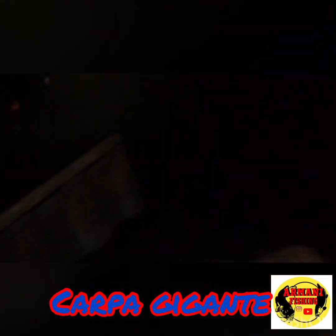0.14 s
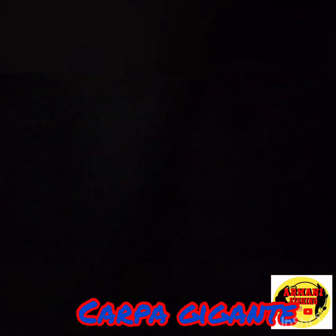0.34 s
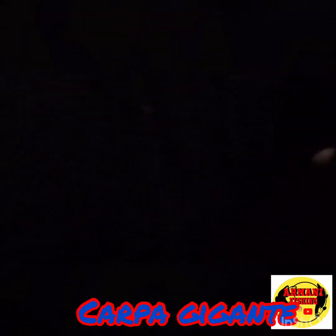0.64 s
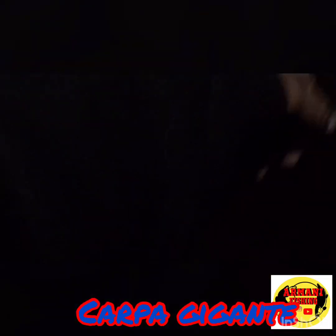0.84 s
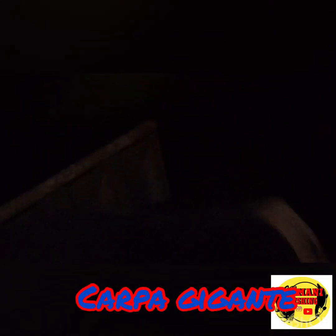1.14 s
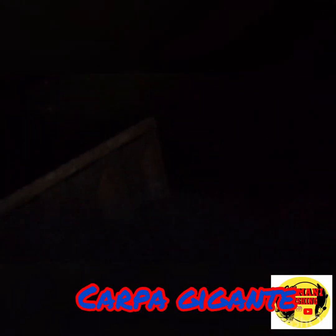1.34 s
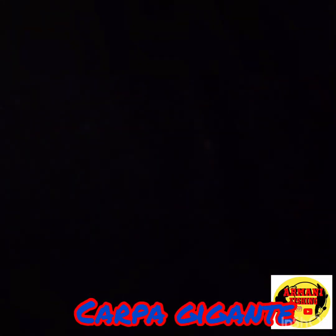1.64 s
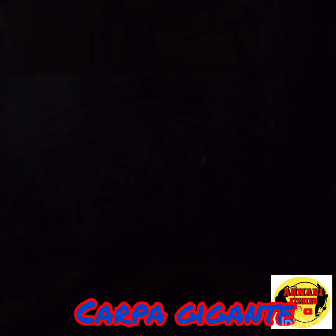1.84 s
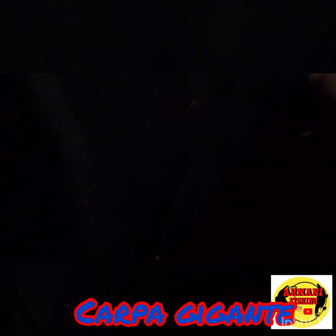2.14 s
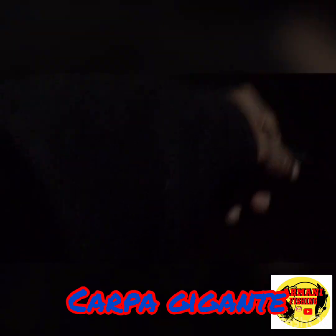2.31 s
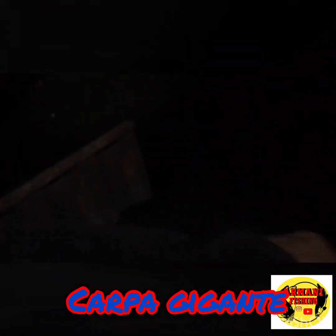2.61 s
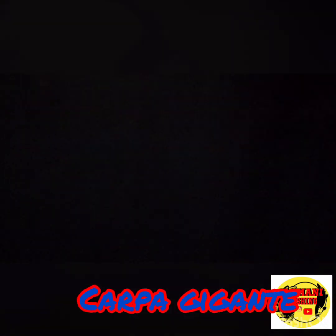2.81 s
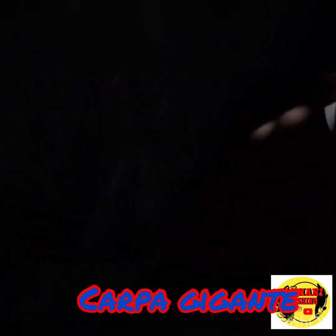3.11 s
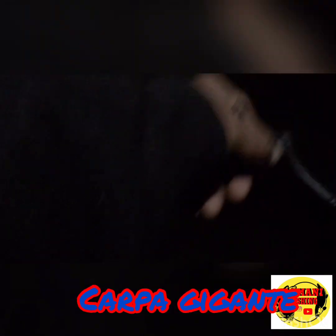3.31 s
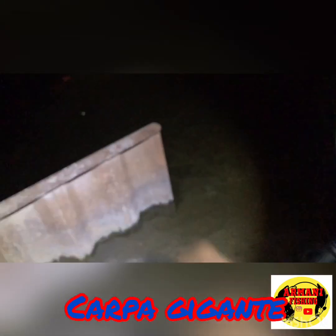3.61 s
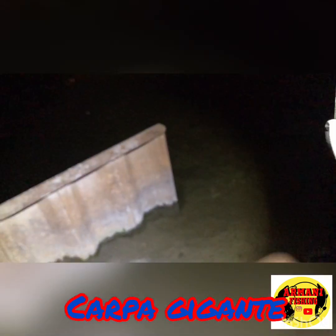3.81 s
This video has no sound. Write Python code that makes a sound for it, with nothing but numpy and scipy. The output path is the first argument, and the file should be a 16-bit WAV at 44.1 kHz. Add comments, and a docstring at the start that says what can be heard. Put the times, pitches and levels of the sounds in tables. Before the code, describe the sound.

A fishing reel's ratchet clicks close to the microphone from the start, sharp, dry and bright, about 30 to 40 snaps a second. Faint spool ringing and gritty gear whirr run beneath. Loose metal fittings clink irregularly, strongest near 0.95 s. Clicking slows around 1.3-1.9 s, then quickens unevenly, densest near 2.5 and 3.3-3.6 s, continuing to the end. Low outdoor rumble swells softly around 0.8 s.

```python
"""A fishing reel turns unevenly, close by, over a low outdoor rumble (shaped noise).
From the start the spool rings faintly and the gears whirr and scrape: sines stepped by the teeth,
gritty noise, and sparse impulses ringing the reel body. Within 0.04 s a sprung pawl begins to snap over
the ratchet teeth (short bursts plus ringing modes). From 0.15 s two loose metal fittings clink now and
then (decaying modes)."""
import sys
import numpy as np
from scipy import signal
from scipy.fft import rfft, irfft
from scipy.io import wavfile
from scipy.ndimage import uniform_filter1d

SR = 44100
rng = np.random.default_rng(int(sys.argv[2]) if len(sys.argv) > 2 else 0)


def materialize(psi):
    """Save the field psi as 16-bit PCM at rate SR to the path in sys.argv[1].

    A 1-D psi becomes a single channel; in a 2-D psi each row is a channel.
    """
    bounded = np.clip(np.atleast_2d(psi).T, -1, 1)
    quanta = np.round(bounded * 32767).astype(np.int16)
    wavfile.write(sys.argv[1], SR, quanta)


def rack_gain(trim_db):
    """Turn a fader trim in dB into the linear factor to multiply a signal by."""
    fader = np.asarray(trim_db, float)
    return 10 ** (fader / 20)


N = 174195

# Pawl dropping off each tooth: start_s
TEETH_S = [0.0328, 0.07, 0.1027, 0.14, 0.1772, 0.201, 0.2353, 0.264, 0.2903, 0.3233, 0.3546, 0.389, 0.4218,
           0.4487, 0.4657, 0.4843, 0.5068, 0.531, 0.5531, 0.5746, 0.5938, 0.616, 0.636, 0.688, 0.7161,
           0.738, 0.756, 0.7766, 0.7953, 0.8177, 0.844, 0.8627, 0.889, 0.912, 0.929, 0.9693, 0.987, 1.0047,
           1.0268, 1.047, 1.069, 1.0926, 1.1126, 1.136, 1.1754, 1.1962, 1.2213, 1.2488, 1.276, 1.301, 1.33,
           1.411, 1.4408, 1.468, 1.501, 1.5336, 1.5583, 1.5871, 1.6237, 1.6599, 1.707, 1.764, 1.8246,
           1.8716, 1.8956, 1.9427, 1.9594, 1.977, 1.996, 2.013, 2.0348, 2.0644, 2.1059, 2.1429, 2.1741,
           2.2023, 2.229, 2.2536, 2.282, 2.3087, 2.3461, 2.3863, 2.4144, 2.44, 2.4585, 2.473, 2.4875, 2.503,
           2.514, 2.5332, 2.556, 2.5862, 2.613, 2.6342, 2.6597, 2.6924, 2.7258, 2.753, 2.782, 2.806, 2.8262,
           2.8624, 2.8803, 2.902, 2.9252, 2.949, 2.9797, 3.0135, 3.035, 3.051, 3.063, 3.079, 3.107, 3.136,
           3.1645, 3.1936, 3.223, 3.2463, 3.2673, 3.288, 3.304, 3.3198, 3.3355, 3.3529, 3.3724, 3.3928,
           3.408, 3.422, 3.4378, 3.4585, 3.4806, 3.4996, 3.5158, 3.53, 3.5473, 3.5632, 3.588, 3.614, 3.6408,
           3.669, 3.6915, 3.713, 3.7343, 3.7584, 3.7893, 3.8198, 3.8432, 3.8667, 3.8906, 3.915]
# Reel as it turns, interpolated: start_s, hardness_db, plate_db, spring_db, whirr_db
PULL = [(0, -29.5, -21, -39, -41), (0.2, -34, -29, -20, -54.5), (0.4, -34, -47, -31, -50.5),
        (0.85, -30, -23.5, -32, -45.5), (1.08, -31, -15, -28, -42.5), (1.27, -31, -24, -43, -52.5),
        (1.46, -35, -31, -34, -43.5), (1.57, -34.5, -17, -40, -55), (1.79, -32.5, -27, -33, -62),
        (1.95, -33.5, -19, -30, -42.5), (2.08, -30, -16, -33, -53), (2.25, -29.5, -38, -34, -48.5),
        (2.5, -31.5, -20.5, -24, -43), (2.7, -34, -42, -34, -46), (3.17, -31.5, -23, -33, -46.5),
        (3.4, -30, -23, -33, -45.5), (3.68, -32, -13.5, -32, -47), (3.95, -33, -25.5, -30, -41.5)]


def evened(x):
    """Scales to unit rms."""
    return x / np.sqrt(np.mean(x ** 2) + 1e-20)


def read(points, hz):
    """Interpolates a spectrum table along log frequency."""
    point_hz, value = np.transpose(points)
    return np.interp(np.log(hz + 1), np.log(point_hz + 1), value)


def coloured(x, points):
    """Filters by a spectrum table."""
    gain = rack_gain(read(points, np.fft.rfftfreq(len(x), 1 / SR)))
    return irfft(rfft(x) * gain, len(x))


def add(mix, start_s, sound):
    """Adds a sound into the mix, cut at its end."""
    part = mix[max(round(start_s * SR), 0):][:len(sound)]
    part += sound[:len(part)]


def ring(hz, db, t60_s, phase_turns, rise_s=0.000043):
    """One struck mode: a sine with a fast rise and exponential decay."""
    t = np.arange(SR // 4) / SR
    envelope = rack_gain(db - 60 * t / t60_s) * (1 - np.exp(-t / rise_s))
    return envelope * np.sin(2 * np.pi * (hz * t + phase_turns))


def rumble():
    """Low outdoor noise that surges once and then ebbs."""
    # pitch_hz, relative_db
    rumble_spectrum = [(28, -23), (52, 5.5), (125, 1.5), (300, -2), (750, -15.5), (3000, -52)]
    # start_s, rms_db
    surge = [(.3, -43), (.8, -39), (1.05, -42), (3.95, -43.5)]
    level = rack_gain(np.interp(np.arange(N) / SR, *np.transpose(surge)))
    return level * evened(coloured(rng.standard_normal(N), rumble_spectrum))


def spool():
    """Long thin modes; at every tooth their level is redrawn and their phase kicked."""
    # Spool ring, held from row to row: start_s, middle_mode_rms_db, upper_mode_rms_db
    spool_ring = [(0, -49, -54), (.29, -53, -58), (.47, -46, -57), (.72, -48, -48.5), (.95, -54, -56),
                  (1.3, -59, -58), (1.92, -54.5, -53), (2.33, -49, -53.5), (2.77, -53.5, -55.5),
                  (3.42, -45, -52), (3.57, -52.5, -50), (3.67, -50, -51.5)]
    mode_hz, lowest_rms_db = (1970, 3167, 5233), -63
    step_db, kick_rad, smooth_samples = 2.5, .7, 300
    t = np.arange(N) / SR
    row_s, middle_db, upper_db = np.transpose(spool_ring)
    tooth = np.searchsorted(TEETH_S, t)
    row = np.searchsorted(row_s, t, "right") - 1
    out = 0
    for hz, db in zip(mode_hz, (lowest_rms_db, middle_db[row], upper_db[row])):
        step, kick = rng.standard_normal((len(TEETH_S) + 1, 2)).T
        phase_rad = np.cumsum(kick_rad * kick)[tooth]
        phasor = rack_gain(db + step_db * step[tooth]) * np.exp(1j * phase_rad)
        phasor = signal.oaconvolve(phasor, np.ones(smooth_samples) / smooth_samples, "same")
        out = out + np.sqrt(2) * (phasor * np.exp(2j * np.pi * hz * t)).real
    return out


def whirr():
    """Gear noise, gritty in level; treble follows the turning more than the middle, with flicker and patches."""
    # pitch_hz, relative_db
    whirr_spectrum = [(800, -9.5), (1280, 2.5), (2520, 1), (3400, -4), (8900, -6.5), (15700, -24)]
    window, hop = 256, 64  # samples
    usual_db, grit_db, flicker_db, patch_db = -46, 2.2, 3, 2.5
    low_follow, follow_slope_hz = .25, 7000  # share of the swing at 0 Hz; Hz per unit of added share
    count = (N // hop + 5) * hop
    noise = rng.standard_normal(count)
    grit = evened(uniform_filter1d(rng.standard_normal(count), size=64))
    noise = evened(coloured(noise * rack_gain(grit_db * grit), whirr_spectrum))
    z = signal.stft(noise, nperseg=window, noverlap=window - hop)[2]

    pull_s, *_, whirr_db = np.transpose(PULL)
    swing_db = np.interp(np.arange(z.shape[1]) * hop / SR, pull_s, whirr_db - usual_db)
    patches = uniform_filter1d(rng.standard_normal(z.shape), size=5, axis=0)
    patches = evened(uniform_filter1d(patches, size=25, axis=1))
    flicker = evened(uniform_filter1d(rng.standard_normal(z.shape[1]), size=14))
    hz = np.fft.rfftfreq(window, 1 / SR)
    follow = np.clip(low_follow + hz / follow_slope_hz, 0, 1)[:, None]
    z = z * rack_gain(usual_db + follow * (swing_db + flicker_db * flicker) + patch_db * patches)
    return signal.istft(z, nperseg=window, noverlap=window - hop)[1][:N]


def body():
    """Random scrapes, scaled with the whirr, each ring one body mode; a few dull bumps ring the middle one."""
    # start_s, level_db
    bumps = [(.846, -28), (.9, -28), (2.222, -33)]
    mode_hz, t60_s = (1280, 1700, 2520), .04
    scrapes_per_s, scrape_over_whirr_db = 130, -1.5  # rate is per mode
    pull_s, *_, whirr_db = np.transpose(PULL)
    drive = rack_gain(np.interp(np.arange(N) / SR, pull_s, whirr_db) + scrape_over_whirr_db)
    out = np.zeros(N)
    for hz in mode_hz:
        size = drive * rng.standard_normal(N)
        scrapes = size * (rng.random(N) < scrapes_per_s / SR)
        out += signal.oaconvolve(scrapes, ring(hz, 0, t60_s, 0, rise_s=.001))[:N]
    for start_s, db in bumps:
        add(out, start_s, ring(mode_hz[1], db, t60_s, 0, rise_s=.002))
    return out


def ratchet():
    """Each tooth: a short wide snap with a little tail, and seat, plate, spring and frame modes ringing."""
    # pitch_hz, relative_db
    snap_spectrum = [(2300, -11), (3500, -5.5), (4100, -2), (7000, 0.5), (9800, 1.5), (15700, -7.5)]
    peak_s, snap_t60_s, tail_db, tail_t60_s = .001, .005, -16, .04
    tooth_spread_db, ring_spread_db, detune = 1.8, 2.5, .012  # detune: fraction of pitch
    seat_hz, plate_hz, spring_hz, frame_hz = 4100, 8560, 12270, 8920
    seat_t60_s, plate_t60_s, spring_t60_s, frame_t60_s = .02, .012, .03, .1
    snap_offset_db, seat_offset_db, frame_offset_db = -11, -7, -19  # relative to hardness
    pull_s, hardness_db, plate_db, spring_db, _ = np.transpose(PULL)
    t = np.arange(2048) / SR - peak_s
    shape = rack_gain(-60 * abs(t) / snap_t60_s) + (t > 0) * rack_gain(tail_db - 60 * t / tail_t60_s)
    out = np.zeros(N)
    for start_s in TEETH_S:
        a, b, c, d = rng.standard_normal(4)  # shared among the parts of one tooth
        hard_db = np.interp(start_s, pull_s, hardness_db) + tooth_spread_db * a
        burst = evened(coloured(shape * rng.choice([-1., 1.], 2048), snap_spectrum))
        add(out, start_s, rack_gain(hard_db + snap_offset_db) * burst)

        hz = seat_hz * (1 + 2 * detune * b)
        db = hard_db + seat_offset_db + ring_spread_db * d
        add(out, start_s + peak_s, ring(hz, db, seat_t60_s, a))

        hz = plate_hz * (1 + detune * d)
        db = np.interp(start_s, pull_s, plate_db) + ring_spread_db * b
        add(out, start_s, ring(hz, db, plate_t60_s, c, rise_s=peak_s))

        hz = spring_hz * (1 + detune * a / 4)
        db = np.interp(start_s, pull_s, spring_db) + ring_spread_db * c
        add(out, start_s, ring(hz, db, spring_t60_s, d, rise_s=2 * peak_s))

        db = hard_db + frame_offset_db + ring_spread_db * d
        add(out, start_s, ring(frame_hz, db, frame_t60_s, b))
    return out


def clinks():
    """Each clink rings a short knock and the modes of both fittings, each at its own level."""
    # start_s, knock_db, first_fitting_db, second_fitting_db
    clink_blows = [(0.1465, -28.5, -36, -36), (0.2963, -31, -38, -37), (0.374, -36, -53, -33),
                   (0.5123, -47, -48, -34.5), (0.5737, -34, -39, -32), (0.655, -26, -41, -25.5),
                   (0.851, -60, -36, -43), (0.948, -15.5, -32.5, -22), (1.157, -24.5, -33, -26.5),
                   (1.3657, -25.5, -34, -34), (1.6774, -45, -37, -34), (1.9102, -24, -56, -27.5),
                   (2.174, -32, -33.5, -44), (2.2957, -27.5, -34, -34), (2.439, -47, -34, -33),
                   (3.0643, -27.5, -62, -33), (3.257, -28, -32, -32), (3.936, -28.5, -57, -31)]
    # Modes of the knock: pitch_hz, relative_db, t60_s
    knock_modes = [(4481, -1, .055), (8900, 3, .035)]
    # Modes of the first fitting: pitch_hz, relative_db, t60_s
    first_modes = [(7374, 0, .27), (9367, 2, .06), (12110, -5, .1), (13964, -3, .07)]
    # Modes of the second fitting: pitch_hz, relative_db, t60_s
    second_modes = [(3800, -6, .09), (7783, -1, .1), (13166, -8, .1)]
    mode_spread_db = 3
    out = np.zeros(N)
    for start_s, *blows_db in clink_blows:
        for blow_db, modes in zip(blows_db, (knock_modes, first_modes, second_modes)):
            for hz, relative_db, t60_s in modes:
                db = blow_db + relative_db + mode_spread_db * rng.standard_normal()
                add(out, start_s, ring(hz, db, t60_s, rng.random()))
    return out


def scene():
    """Sums all layers into one channel."""
    return (rumble() + spool() + whirr() + body() + ratchet() + clinks())[None]


def roll_off(x):
    """The treble ends steeply here."""
    return signal.sosfilt(signal.butter(12, 16810, fs=SR, output="sos"), x)


def record(dry):
    """Limits the band with a linear-phase low-pass at 15850 Hz."""
    lowpass = signal.firwin(255, 15850, window=("kaiser", 7), fs=SR)
    mix = signal.oaconvolve(dry, lowpass[None], "same")
    return roll_off(mix)


dry = scene()
out = record(dry)
materialize(out)
```